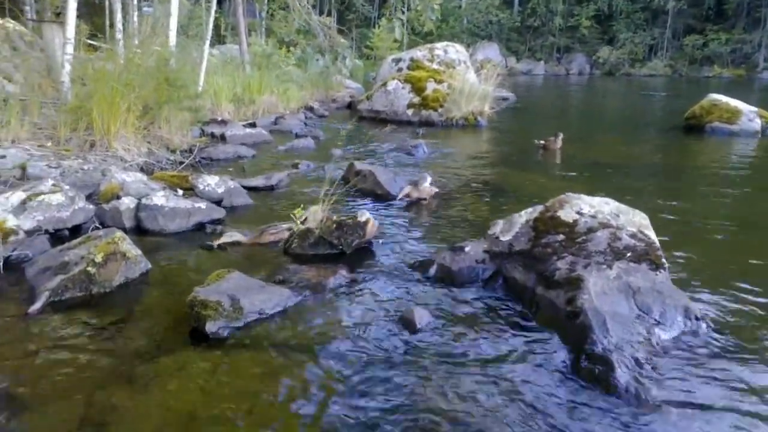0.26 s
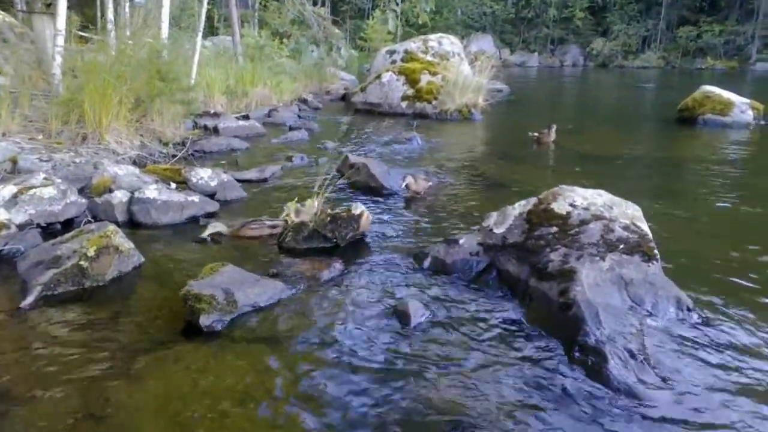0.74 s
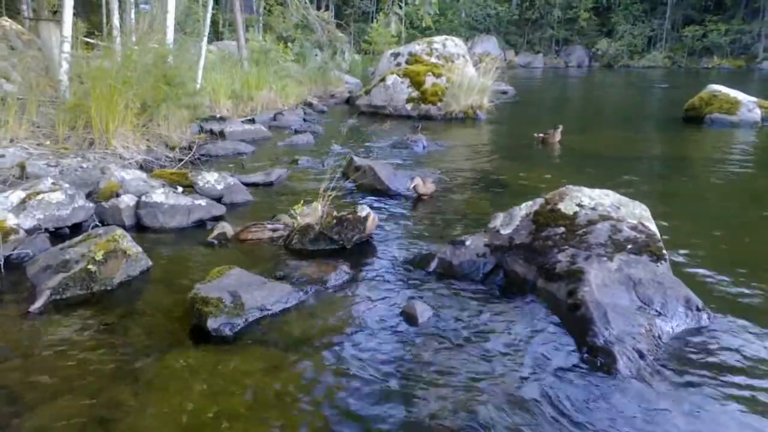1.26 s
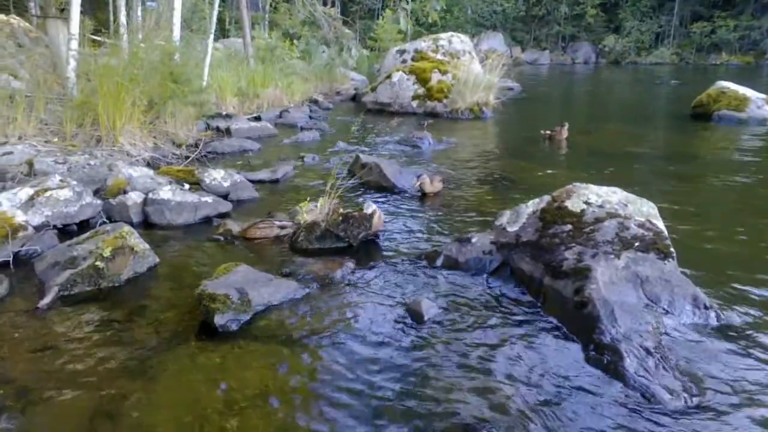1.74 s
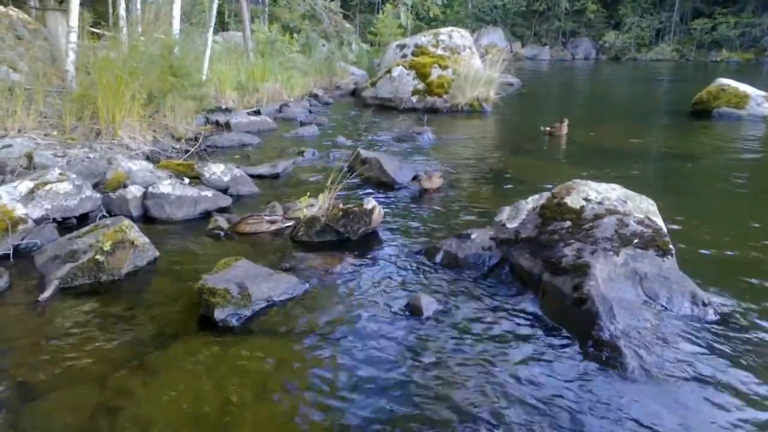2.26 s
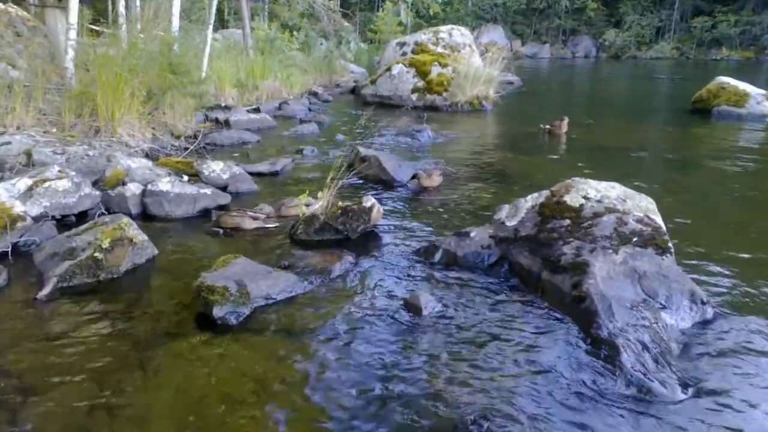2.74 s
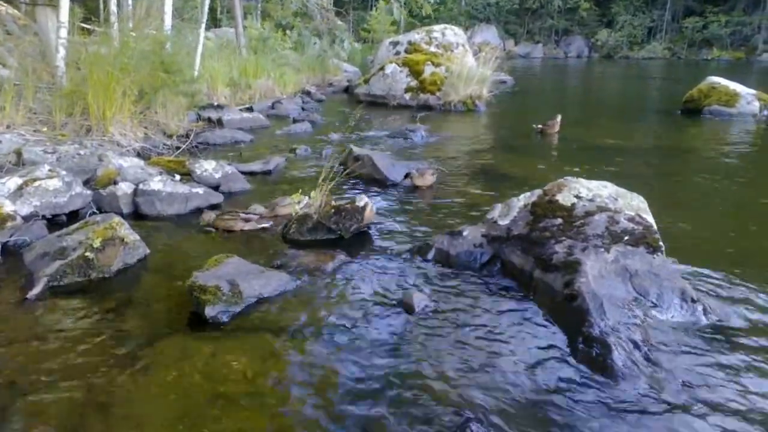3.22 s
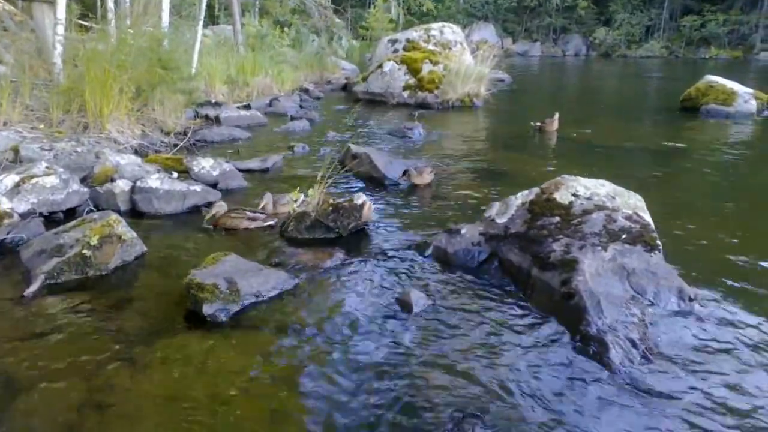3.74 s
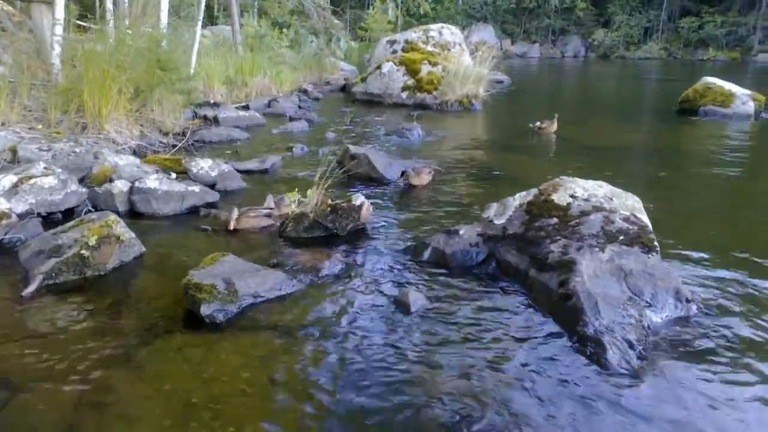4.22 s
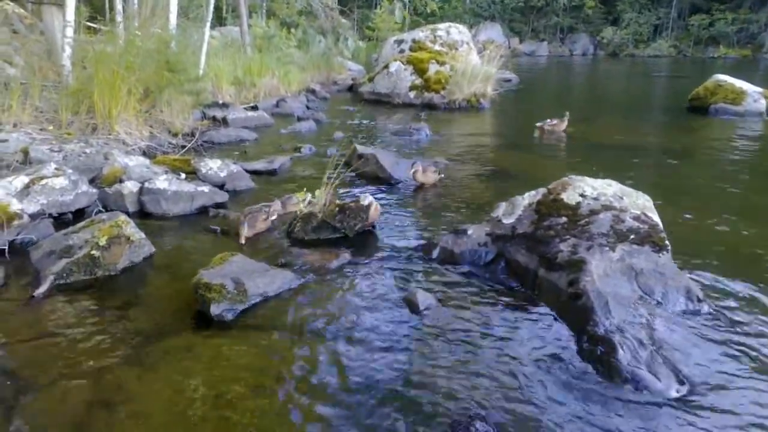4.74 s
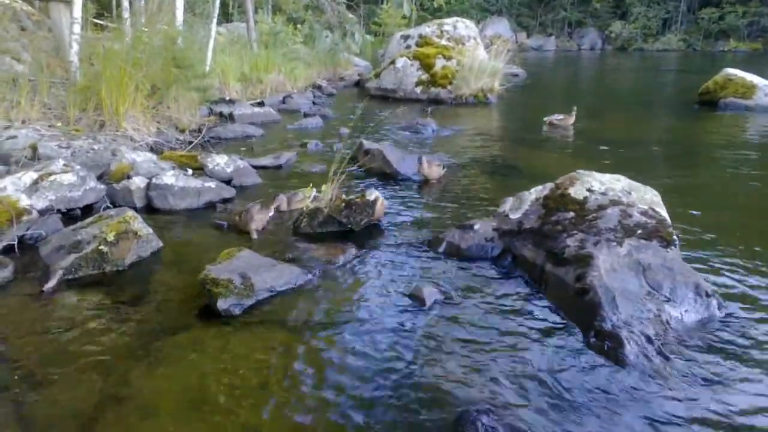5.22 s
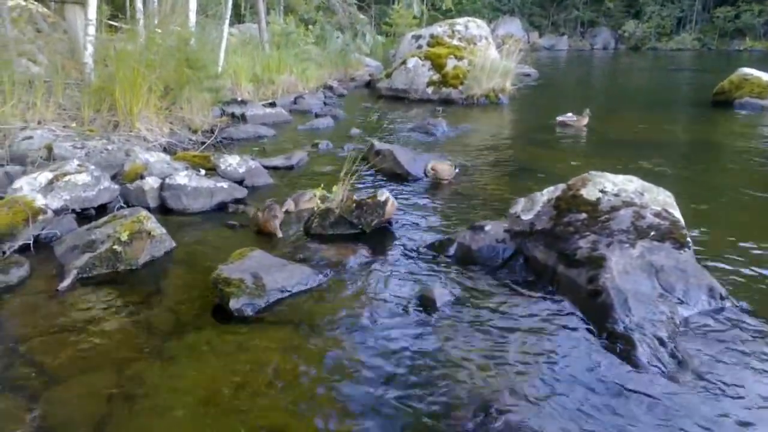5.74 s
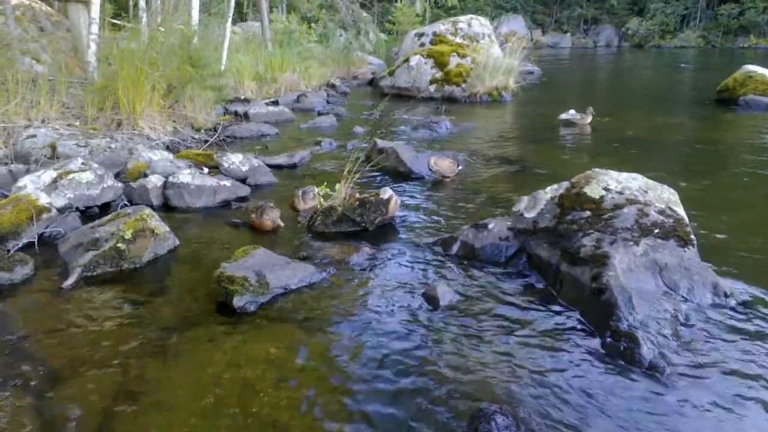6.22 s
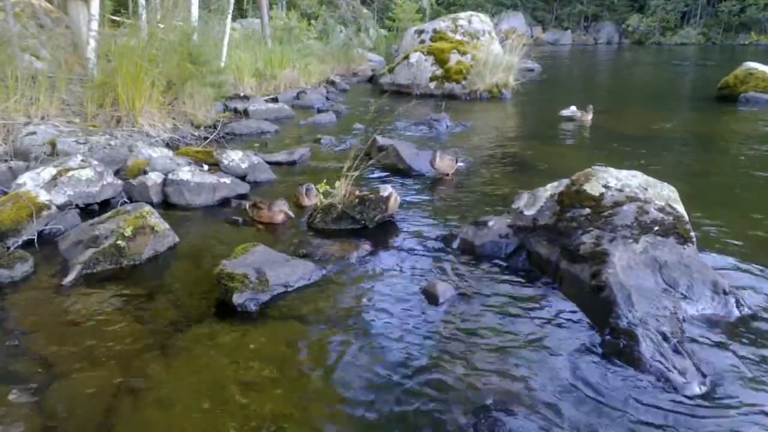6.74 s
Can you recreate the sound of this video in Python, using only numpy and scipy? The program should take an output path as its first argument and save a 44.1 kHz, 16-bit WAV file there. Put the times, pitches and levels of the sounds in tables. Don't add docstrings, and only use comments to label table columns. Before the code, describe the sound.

Outdoor stereo from a hand-held phone a few metres from feeding ducks. Low wind rumble swells unevenly, stronger on the left, over a faint wavering motor. Quiet peeps open the scene; handling clicks jab on the right, then sparse water drops and bright ticks continue. Louder plops come around four and four and a half seconds, later a cluster of dull plops with weak high peeps.

```python
import sys
import numpy as np
from scipy import signal
from scipy.fft import rfft, irfft
from scipy.io import wavfile
from scipy.ndimage import uniform_filter1d

SR = 44100
rng = np.random.default_rng(int(sys.argv[2]) if len(sys.argv) > 2 else 0)


def gain_from_db(level_db):
    decades = np.asarray(level_db, float) / 20
    return 10 ** decades


def to_wav(s):
    ch = np.atleast_2d(s).T
    pcm = np.round(np.clip(ch, -1, 1) * 32767)
    wavfile.write(sys.argv[1], SR, pcm.astype(np.int16))


N = 307377


def shape(x, hz, db):
    f = np.log(np.maximum(np.fft.rfftfreq(x.shape[-1], 1 / SR), 1))
    gain = gain_from_db(np.interp(f, np.log(hz), db))
    return irfft(rfft(x) * gain, x.shape[-1]) * np.sqrt(SR / 2)


def walk(rate):
    k = int(SR / rate)
    held = np.repeat(rng.standard_normal(N // k + 1), k)
    w = uniform_filter1d(uniform_filter1d(held, k), k)[:N]
    return w / w.std()


def curve(table):
    s, *columns = np.transpose(table)
    return np.array([np.interp(np.arange(N) / SR, s, c) for c in columns])


def add(out, s, sound, pan_db, lag=0):
    for port, start, db in ((0, int(s * SR + lag), pan_db / 2), (1, int(s * SR), -pan_db / 2)):
        part = sound[max(-start, 0):N - start]
        first = max(start, 0)
        out[port, first:first + len(part)] += part * gain_from_db(db)


def ring(hz, t60, rise=0., attack=.9):
    t = np.arange(int(t60 * SR) + 2) / SR
    phase = 2 * np.pi * hz * (t + rise * t ** 2 / (2 * t60))
    swell = 1 - np.exp(-t * hz / attack)
    return np.sin(phase) * 1000. ** (-t / t60) * swell


def gusts(table, lull_db):
    gust_s, lull_wander_db = .048, 3
    t = np.arange(N) / SR
    power = gain_from_db(lull_db + lull_wander_db * walk(5)) ** 2
    for s, db in table:
        power = power + gain_from_db(db) ** 2 * np.exp(-((t - s) / gust_s) ** 2)
    return np.sqrt(power)


def wind():
    # (frequency [Hz], left density [dB per Hz], right density [dB per Hz])
    buffet = [(5, -0.5, -10.5), (14.5, 2.5, 3), (29, -1, -1), (49.6, -6.5, -10.5), (79, -16, -27),
              (128, -36.5, -36), (250, -58, -66), (600, -81, -94)]
    # (time [s], level [dB])
    gusts_left = [(.13, -59), (.58, -40.5), (.72, -35.5), (.97, -42.5), (1.08, -45), (1.43, -38),
                  (1.52, -40), (1.7, -39), (1.78, -33), (1.97, -42), (2.55, -39.5), (2.77, -39.5),
                  (2.87, -47.5), (3.09, -40), (3.33, -40.5), (3.47, -40), (3.59, -38), (3.68, -34.5),
                  (3.78, -32), (3.99, -42.5), (4.2, -35.5), (4.3, -36), (4.42, -28.5), (4.57, -38),
                  (4.88, -35), (5.09, -42), (5.88, -40.5), (6.47, -46), (6.73, -44), (6.88, -41.5)]
    # (time [s], level [dB])
    gusts_right = [(1.09, -45.5), (1.4, -43), (1.75, -49), (1.98, -48), (2.11, -42.5), (2.64, -50),
                   (3.89, -45.5), (4.57, -38.5), (4.91, -42), (5.14, -43), (5.35, -43.5), (5.46, -43.5),
                   (5.64, -48), (5.78, -45), (6.22, -44), (6.52, -47)]
    hz, *ports = np.transpose(buffet)
    rumble = np.array([shape(rng.standard_normal(N), hz, db) for db in ports])
    span = int(.16 * SR)
    power = uniform_filter1d(uniform_filter1d(rumble ** 2, span), span)
    swells = np.array([gusts(gusts_left, -51.5), gusts(gusts_right, -53.5)])
    return gain_from_db(1.5) * rumble / np.sqrt(power) * swells


def distance():
    # (frequency [Hz], density [dB per Hz])
    drone = [(30, -93.5), (60, -79), (100, -83.5), (200, -92), (270, -99), (340, -100.5), (390, -110),
             (650, -111), (1100, -107), (2000, -116)]
    # (frequency [Hz], width [Hz], level [dB])
    hums = [(65.03, 2.42, -60), (94.7, 4.04, -66), (175.7, 4.05, -73), (335.3, 6.04, -83)]
    # (time [s], level [dB])
    motor = [(0.0, -62.5), (.45, -79), (1.0, -66.5), (2.1, -73), (2.45, -66), (2.85, -59), (3.3, -54.5),
             (3.95, -74.5), (5.1, -66.5), (6.1, -74), (6.5, -65.5), (6.97, -81)]
    motor_hz, drone_db, drone_per_motor_db = 144.9, 17, .2042
    out = shape(rng.standard_normal(N), *np.transpose(drone))
    for hz, width, db in hums:
        hum = np.sin(2 * np.pi * np.cumsum(hz + width / 2 * walk(6)) / SR)
        out = out + gain_from_db(db + 1.77 * walk(8)) * hum
    tone = np.sin(2 * np.pi * np.cumsum(motor_hz + 1.0 * walk(4)) / SR)
    motor_db = curve(motor)[0]
    drone_gain = gain_from_db(1.73 * walk(6) + drone_db + drone_per_motor_db * motor_db)
    tone_gain = np.sqrt(2) * gain_from_db(motor_db - 3 + 3.5 * walk(9))
    return out * drone_gain + tone_gain * tone


def placed(s, hz):
    # (time [s], lag of the left port [samples], left minus right [dB])
    spot = [(0, -6, 4.5), (.54, 4, -10), (1.3, 9, 0), (2.1, -5, -3), (3.97, 1.5, 5), (4.19, 14, -4.5),
            (4.5, 9, -0.5), (5, 4, 0), (7, 5.5, 1)]
    # (frequency [Hz], left minus right [dB])
    port_tilt = [(1100, 1), (2000, -9.5), (3300, -18), (8000, -10.5)]
    times, lags, pans = np.transpose(spot)
    tilt_hz, tilt_db = np.transpose(port_tilt)
    tilt = np.interp(np.log(hz), np.log(tilt_hz), tilt_db)
    return np.interp(s, times, pans) * (hz < 1500) + tilt, np.interp(s, times, lags)


def water():
    # (time [s], peak [dB], pitch [Hz], t60 [ms], rise over t60
    plops = [(0.0, -43, 600, 57, -.16), (.536, -56.5, 1350, 69, 0), (1.152, -52.5, 330, 55, -1),
             (1.265, -45, 400, 90, 0), (1.266, -50, 600, 20, -.3), (1.281, -49, 430, 50, -.2),
             (1.292, -51, 390, 35, .2), (1.3795, -38.5, 620, 22, -.1), (1.97, -54, 350, 89, -0.4),
             (2.0867, -40, 880, 36, .3), (2.295, -52.5, 1090, 43, 0.5), (2.872, -54, 590, 58, 0.6),
             (3.23, -55, 1100, 22, 0.8), (4.192, -37.5, 720, 28, -.35), (4.211, -52, 700, 30, 0),
             (4.4785, -39.5, 940, 60, -.25), (4.482, -40, 845, 125, -.03), (4.625, -55, 720, 45, 0),
             (4.969, -47.5, 757, 45, 2.5), (5.318, -55, 398, 38, 0.5), (5.585, -57, 930, 72, -.08),
             (6.251, -39, 337, 22, -.23), (6.308, -48, 1250, 45, 1), (6.436, -42, 355, 29, 0),
             (6.452, -49, 1150, 37, 0.1), (6.485, -41, 380, 17, 0.2), (6.567, -45.5, 327, 23, 0.3),
             (6.7, -33, 375, 14.6, 0.2)]
    # (time [s], peak [dB], start pitch [Hz], t60 [ms])
    drips = [(.298, -61, 950, 45), (0.497, -58, 1140, 40), (.69, -53, 600, 23), (1.16, -60, 900, 30),
             (1.152, -59, 1550, 25), (2.091, -47.5, 1060, 41), (6.874, -56, 1350, 35),
             (.539, -48.5, 567, 37), (1.131, -58, 890, 59), (1.908, -53, 1030, 53), (3.017, -54.5, 898, 57),
             (3.439, -60, 980, 76), (4.191, -40, 815, 19), (4.473, -22.5, 900, 8.6),
             (4.576, -55.5, 1040, 67), (4.612, -56, 884, 160), (4.673, -54.5, 1004, 73),
             (4.765, -53, 990, 28), (4.82, -59, 1270, 37), (4.985, -59, 845, 110), (5.005, -58, 660, 30),
             (5.45, -62, 870, 60), (6.04, -52, 1900, 55), (6.05, -58, 1500, 35), (6.253, -45, 740, 17),
             (6.701, -49, 600, 26), (6.752, -46.5, 1020, 30)]
    # (time [s], peak [dB], pitch [Hz], t60 [ms])
    ticks = [(.136, -56, 2430, 15), (.68, -48.5, 2180, 25), (.787, -48, 2600, 11), (.9, -43, 4300, 9.6),
             (1.243, -44, 2010, 16), (2.14, -52, 1790, 20), (2.243, -47, 2300, 31), (2.245, -53, 1950, 25),
             (2.903, -45.5, 6740, 16), (3.03, -45, 4800, 11.5), (3.293, -53, 4040, 15),
             (3.79, -61, 2100, 25), (3.966, -46, 4580, 20), (4.474, -42.5, 3200, 12),
             (4.4745, -46, 5500, 10), (4.754, -52, 2300, 20), (5.502, -35.5, 4030, 6.6),
             (5.816, -51, 3550, 35), (6.308, -54, 2180, 15), (6.59, -52, 2100, 15)]
    # (time [s], peak [dB], pitch [Hz], t60 [ms], rise over t60 [share])
    gulps = [
        (3.9617, -27.5, 1300, 26, -.2),
        (3.981, -47, 1180, 35, .3),
        (3.992, -54, 1200, 30, 0),
    ]
    drip_climb_per_s, tick_rise, gulp_swell_cycles = 17, .14, 2.5
    out = np.zeros((2, N))
    pockets = [(*row, .9) for row in plops]
    pockets += [(*row, drip_climb_per_s * row[-1] / 1000, .9) for row in drips]
    pockets += [(*row, tick_rise, .9) for row in ticks]
    pockets += [(*row, gulp_swell_cycles) for row in gulps]
    for s, db, hz, t60_ms, rise, swell_cycles in pockets:
        add(out, s, gain_from_db(db) * ring(hz, t60_ms / 1000, rise, swell_cycles), *placed(s, hz))
    for at, pitch, size, turns in rng.random((250, 4)):
        hz = 280 * 2 ** (2.8 * pitch)
        t60 = (6 + 25 * turns ** 2) / hz
        add(out, at * N / SR, gain_from_db(-74 + 14 * size ** 3) * ring(hz, t60, .4), -1.2)
    t = np.arange(SR // 8) / SR
    rocks = rng.standard_normal((2, len(t))) * 1000. ** (-t / .07) * (t > .004)
    return out + gain_from_db(-35) * signal.fftconvolve(out, rocks, axes=1)[:, :N]


def slaps():
    # (time [s], level [dB], top [Hz], t60 [ms], left minus
    # right [dB])
    thumps = [(0.0, -50, 1300, 78, 0), (2.085, -51, 1500, 47, -2), (2.298, -52, 700, 23, 0),
              (3.11, -52, 800, 32, 0), (.537, -43.5, 1610, 30, 7), (1.152, -49.5, 1700, 62, -8),
              (1.236, -40.5, 800, 29, -23.5), (1.24, -56, 2390, 120, -11), (1.266, -52.5, 600, 130, 2),
              (1.379, -40, 760, 25, -2), (1.495, -39, 1030, 17, -19), (1.431, -48, 2000, 34, -19),
              (1.83, -47, 1000, 12, 5), (3.375, -42, 2200, 14, 2), (3.962, -50, 700, 86, -6),
              (4.191, -52, 800, 170, -1), (4.475, -56, 770, 210, 0), (6.252, -47.5, 1285, 45, -4),
              (6.438, -52.5, 800, 62, -10), (6.7, -54, 960, 110, -6)]
    # (time [s], level [dB], low edge [Hz], t60 [ms])
    cracks = [(.06, -58, 1200, 17), (.136, -50, 1700, 14), (.236, -62, 1000, 27), (.72, -49, 2000, 8.7),
              (.787, -50, 1300, 13), (.92, -50, 2400, 8.9), (1.08, -45, 4000, 8), (1.238, -45, 1700, 13),
              (2.243, -54, 1500, 15), (2.803, -57, 3300, 8), (2.904, -51, 4600, 8), (3.029, -45, 3630, 12),
              (3.16, -50, 3300, 6), (3.293, -52, 3800, 6), (3.39, -54, 3800, 6), (3.962, -53.5, 2000, 72),
              (3.963, -56, 4800, 80), (4.192, -60, 1300, 15), (4.472, -49, 1700, 26),
              (4.473, -47, 3600, 22), (4.755, -52, 2100, 10), (4.97, -58, 800, 30), (5.501, -44, 2800, 14),
              (6.308, -52, 1100, 12), (6.59, -58, 1300, 13)]
    slap_low_hz, crack_span = 194, 2.15
    out = np.zeros((2, N))
    t = np.arange(SR // 6) / SR
    rows = [(s, db, slap_low_hz, top_hz, t60_ms, pan_db) for s, db, top_hz, t60_ms, pan_db in thumps]
    for s, db, hz, t60_ms in cracks:
        rows.append((s, db, hz, hz * crack_span, t60_ms, placed(s, 2.6 * hz)[0]))
    for s, db, low_hz, high_hz, t60_ms, pan_db in rows:
        noise = rng.standard_normal(len(t))
        sos = signal.butter(3, [low_hz, high_hz], "band", fs=SR, output="sos")
        band = signal.sosfilt(sos, noise)
        envelope = 1000. ** (-1000 * t / t60_ms) * (1 - np.exp(-t * low_hz))
        add(out, s, gain_from_db(db) * band / band.std() * envelope, pan_db, placed(s, low_hz)[1])
    return out


def ducks():
    # (time [s], length [s], top [Hz], fall at the end [share], peak [dB])
    peeps = [
        (.056, .064, 1600, .19, -59),
        (.158, .044, 990, .2, -60.5),
        (.435, .077, 1620, .24, -59),
        (.632, .074, 1560, .2, -59.5),
        (.69, .04, 990, .22, -58.5),
        (2.07, .05, 1010, .32, -54),
        (4.35, .085, 1550, .28, -71),
        (4.74, .06, 1950, .22, -71.5),
    ]
    # (time [s], length [s], top [Hz], fall at the end [share], peak [dB])
    far_peeps = [
        (6.306, .08, 1970, .37, -62),
        (6.498, .08, 2080, .36, -66),
        (6.685, .072, 2090, .3, -67.5),
        (6.874, .074, 2050, .35, -66.5),
    ]
    # (time [s], length [s], top [Hz], fall at the end [share], peak [dB])
    rising_peeps = [
        (.238, .054, 2270, .34, -61),
    ]
    # (time [s], length [s], top [Hz], fall at the end [share], peak [dB])
    eager_peeps = [
        (.231, .076, 1960, .35, -57),
    ]
    rise_of_fall = .85
    rock_echo_s, rock_echo_db = .006, -9
    out, tremble = np.zeros((2, N)), walk(130)
    kinds = ((peeps, .15, 1, 2.3), (far_peeps, .27, 1, 2),
             (rising_peeps, 0, .05, 2.4), (eager_peeps, 0, 1, 1.8))
    for rows, early, sung, flat in kinds:
        for s, length, top_hz, fall, db in rows:
            u = np.linspace(-1, 1, int(length * SR))
            bend = np.interp(u, (-1, 1), (-1, sung)) + early * (1 - u ** 2)
            side = np.where(bend < 0, rise_of_fall, 1)
            hz = top_hz - np.abs(bend) ** flat * top_hz * fall * side
            shake = tremble[int(s * SR):][:len(u)]
            phase = 2 * np.pi * np.cumsum(hz * (1 + .011 * shake)) / SR
            swell = gain_from_db(db - 3.5 + 2.4 * shake) * (1 - u ** 8) ** .5
            whistle = swell * np.sin(phase)
            octave = swell * gain_from_db(-5) * (hz / 2000) ** 4 * np.sin(2 * phase)
            add(out, s, whistle, .3)
            add(out, s + rock_echo_s, gain_from_db(rock_echo_db) * whistle, 5, -6)
            add(out, s, octave, -11)
    return out


def fingers():
    # (time [s], ring [dB], thud [dB], lift of the upper modes [dB])
    slips = [(1.2375, -35, -27, 0), (1.2394, -29, -20.5, 0), (1.2605, -43, -62, 0), (1.4242, -41, -50, 7),
             (1.431, -40, -45, 4), (1.4327, -35, -50, 7), (1.4337, -37, -50, 7), (1.4345, -36, -50, 3),
             (1.4353, -33, -47, 0), (1.4376, -24.5, -40, -2), (1.4397, -31, -47, 0), (1.441, -38, -50, 0),
             (1.4937, -39, -71, 3), (1.4953, -38, -60, 3), (1.4964, -16.5, -50, -.5), (1.739, -48, -66, 6)]
    # (frequency [Hz], level [dB], t60 [s])
    case_modes = [(2600, -14.5, 0.018), (3350, 5, 0.0036), (3870, 4, 0.0025), (5810, -1.5, 0.0045),
                  (8700, -18, 0.0064)]
    case, thuds = np.zeros((2, 2, N))
    for s, ring_db, thud_db, bright_db in slips:
        for hz, db, t60 in case_modes:
            mode_db = ring_db + db - 24.5 + bright_db * (hz > 5000)
            add(case, s, gain_from_db(mode_db) * ring(hz, t60, attack=.11), -38)
        add(thuds, s, gain_from_db(thud_db + 1) * ring(630.0, .0038), -13)
    no_bass = signal.butter(4, 2300., "high", fs=SR, output="sos")
    return signal.sosfilt(no_bass, case) + thuds


def overtones():
    # (time [s], length [s], frequency [Hz], level [dB])
    carried = [
        (2.15, .3, 338, -74),
        (2.25, .3, 312, -73),
        (2.75, .25, 245, -72),
        (2.8, .4, 340, -73),
        (2.85, .3, 310, -71),
        (3.0, .4, 220, -70),
        (3.15, .2, 240, -72),
        (3.25, .4, 340, -74),
        (3.25, .2, 308, -76),
    ]
    t = np.arange(N) / SR
    out = np.zeros(N)
    for s, length, hz, db in carried:
        swell = np.sin(np.pi * np.clip((t - s) / length, 0, 1))
        out += gain_from_db(db) * swell * np.sin(2 * np.pi * hz * t)
    return out


def scene():
    far = distance() + overtones()
    left_lag = 10
    far_ports = np.array([np.roll(far, left_lag), far])
    return wind() + far_ports + water() + slaps() + ducks() + fingers()


def low_pass(x):
    return signal.sosfilt(signal.butter(12, 16400, fs=SR, output="sos"), x)


def record(dry):
    # (frequency [Hz], left density [dB per Hz], right density [dB per Hz])
    capsule_hiss = [(152, -105, -93), (450, -110, -108), (800, -109, -107), (1700, -105, -103),
                    (2300, -105, -95.5), (3200, -105, -89), (4250, -104, -90), (5260, -106, -96),
                    (6010, -108, -91.5), (6840, -110, -99), (8100, -108, -103), (11000, -103, -101),
                    (13800, -97.5, -96), (15970, -104, -103)]
    hz, *ports = np.transpose(capsule_hiss)
    hiss = np.array([shape(rng.standard_normal(N), hz, db) for db in ports])
    top_cut = signal.ellip(10, .2, 80, 15760, fs=SR, output="sos")
    return low_pass(signal.sosfilt(top_cut, dry + hiss))


dry = scene()
out = record(dry)
to_wav(out)
```